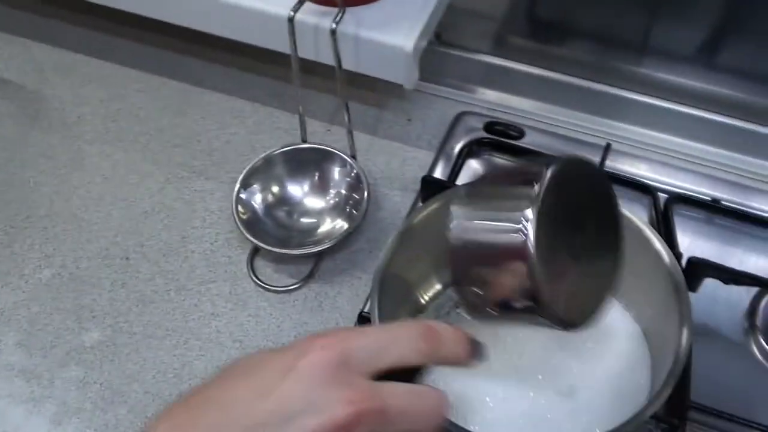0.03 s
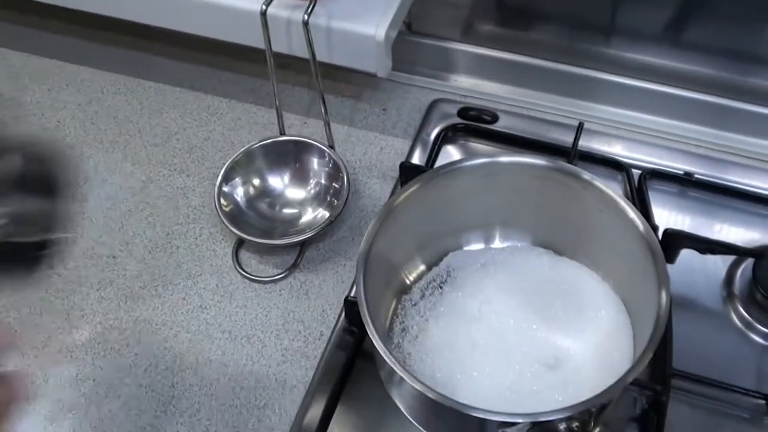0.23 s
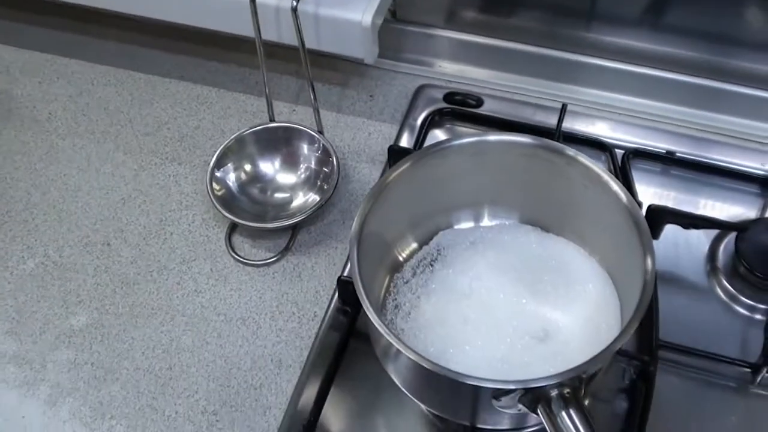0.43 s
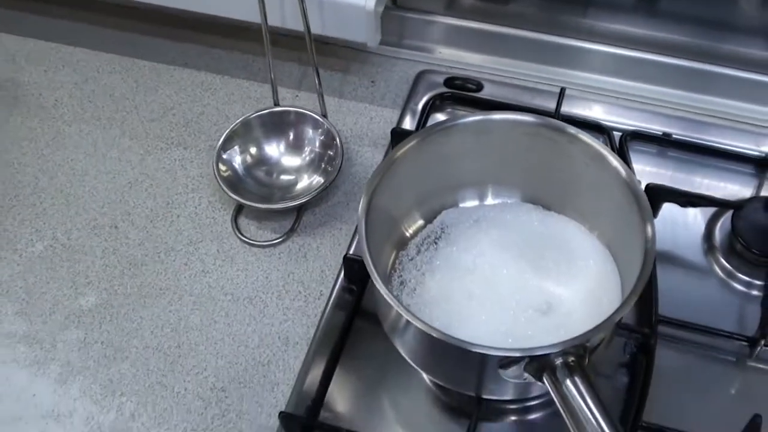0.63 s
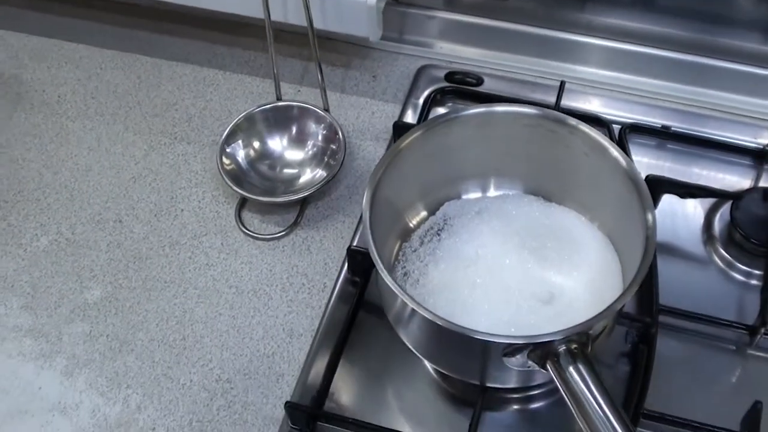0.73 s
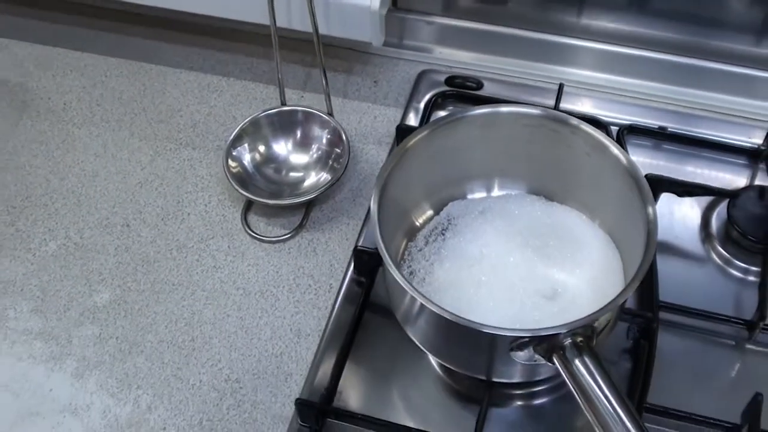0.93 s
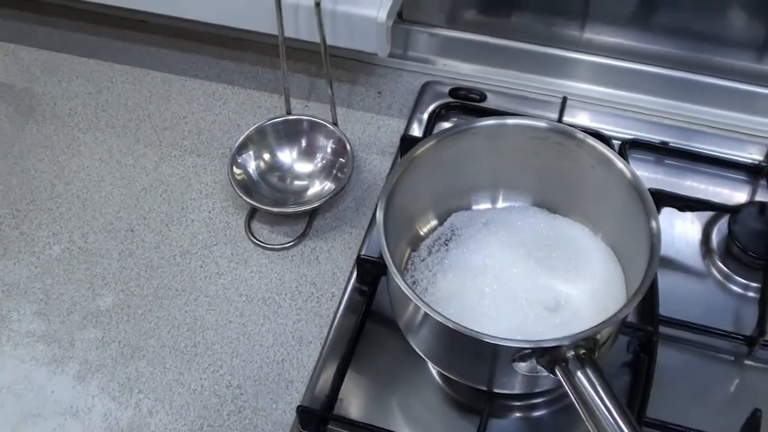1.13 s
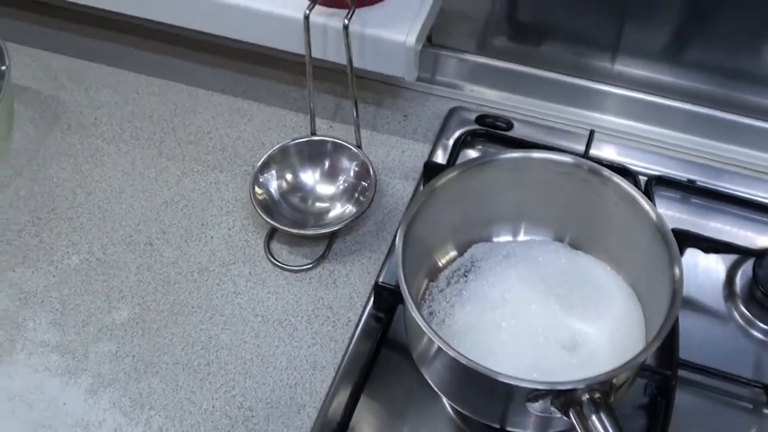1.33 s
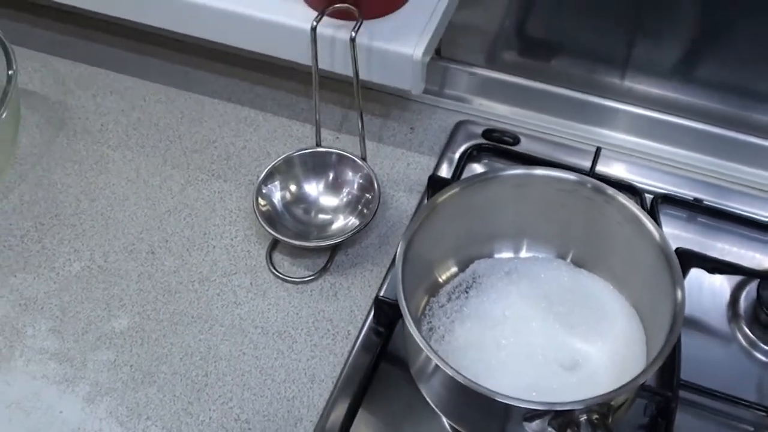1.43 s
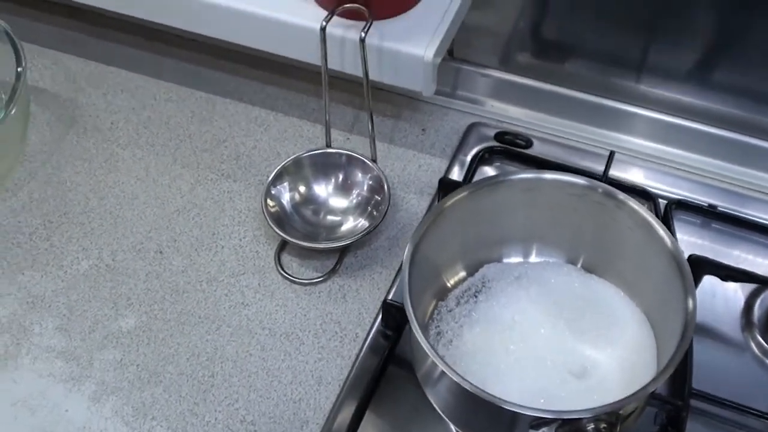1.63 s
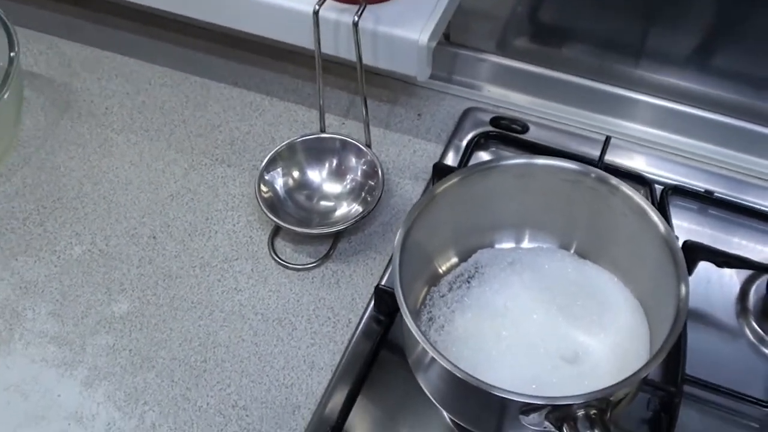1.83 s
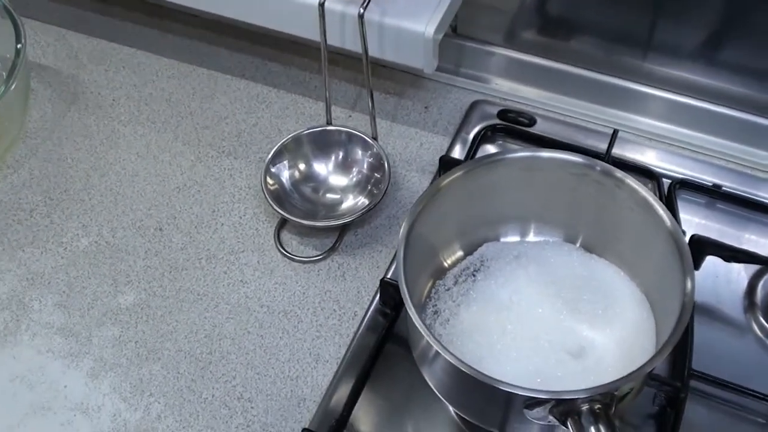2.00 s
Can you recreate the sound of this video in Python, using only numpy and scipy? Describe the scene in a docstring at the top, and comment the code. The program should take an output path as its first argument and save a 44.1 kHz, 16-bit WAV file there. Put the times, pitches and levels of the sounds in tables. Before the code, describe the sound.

A steel measuring cup clunks and clatters onto a worktop, then scrapes gritty sugar and knocks a vessel.

```python
"""A small kitchen with a faint hum: sugar is poured and a steel measuring cup is put down on a worktop.
The last sugar hisses into a saucepan (dense tiny impacts); a short gritty scuff follows (finer grains).
The empty cup lands, bounces and clatters to rest: damped bursts plus decaying modes of worktop, base and rim.
It is then pushed over grit (shaped grain noise, bumps), and another vessel is knocked (a burst, ringing modes).
Each blow gets its own decaying-noise reverberation; shaped noise and steady sines make the background."""
import sys
import numpy as np
from scipy import signal
from scipy.fft import rfft, irfft, next_fast_len
from scipy.io import wavfile
from scipy.ndimage import uniform_filter1d, minimum_filter1d, map_coordinates

SR = 44100
rng = np.random.default_rng(int(sys.argv[2]) if len(sys.argv) > 2 else 0)


def int16_out(signal):
    """Quantize to a 16-bit WAV file."""
    q = np.round(np.clip(np.atleast_2d(signal).T, -1, 1) * 32767)
    wavfile.write(sys.argv[1], SR, q.astype(np.int16))


N = 91022

# All spectra are relative: coloured() rescales to rms 1.
# cup contacts [t/s, thud level/dB, worktop ring level/dB, worktop tilt/(dB/octave), base ring level/dB,
# rim ring level/dB, rim t60/s, crack level/dB]
CUP_CONTACTS = [(0.7108, -2, -20, 1.5, -0.5, -33, 0.23, -22), (0.7362, -16, -21.5, 2, -1, -42, 0.073, -32),
                (0.7993, -19.5, -23, 3, -9.5, -30.5, 0.035, -24.5),
                (0.9147, -26.5, -37, -4, -42, -26.5, 0.21, -15),
                (0.927, -10.5, -20, -3, -16, -17, 0.087, -14),
                (0.9358, -21.5, -25, 3.5, -15.5, -22, 0.14, -17.5),
                (0.985, -19.5, -36.5, -2, -36, -13, 0.032, -12.5),
                (1.0010, -15.5, -25.5, 1, -42, -36, 0.15, -34)]
# cup base modes [f/Hz, level/dB, t60/s]
BASE_MODES = [(1250, -6, .035), (1288, 5, .045), (1323, -17, .36), (1700, -14, .03), (2010, -19, .03)]
# cup rim modes [f/Hz, level/dB]
RIM_MODES = [(2630, -9), (2955, -13.5), (4250, -0.5), (4400, -4), (5003, -12.5), (5890, -9), (6400, -7.5),
             (7415, -3.5), (8690, -9), (10090, -13)]
# worktop modes [f/Hz, level/dB]
WORKTOP_MODES = [(296, -6.5), (432, -7), (555, -8), (625, -4.5), (710, -6), (787, -0.5), (864, -5.5),
                 (953, -1.5), (1077, -2.5), (1154, -12), (1246, -4.5), (1402, -14)]
# spectrum of a flat landing [f/Hz, level/dB]
THUD_SPECTRUM = [(200, -23), (290, -5), (510, -9), (850, -0.5), (1150, -5.5), (1500, -14), (4000, -48.5)]
# spectrum of an edge contact [f/Hz, level/dB]
CRACK_SPECTRUM = [(400, -19), (2700, -2.5), (3600, -11), (5000, -10.5), (7200, 1), (9500, -8), (16000, -21)]
# level of the drag noises [t/s, rumble level/dB, rasp level/dB, hiss level/dB]
DRAG_LEVELS = [(1.165, -65, -48, -55), (1.19, -48, -37.5, -42), (1.26, -46, -37.5, -40),
               (1.34, -38, -41.5, -37.5), (1.41, -37.5, -34, -32.5), (1.47, -35.5, -30, -26.5),
               (1.55, -28, -32, -30.5), (1.64, -37.5, -32.5, -28.5), (1.70, -29, -28, -30.5),
               (1.80, -34.5, -31.5, -32), (1.88, -44, -36, -39.5), (1.96, -40, -42.5, -54),
               (2.1, -70, -34.5, -54)]
# drag rumble spectrum [f/Hz, level/dB]
RUMBLE_SPECTRUM = [(40, -46), (110, -12), (410, 3), (490, -6), (570, -4.5), (850, -6), (1600, -20),
                   (4000, -59)]
# drag rasp spectrum [f/Hz, level/dB]
RASP_SPECTRUM = [(400, -18), (1000, 2), (2500, 2.5), (4800, -4), (9000, -21.5)]
# drag hiss and bump grit spectrum [f/Hz, level/dB]
HISS_SPECTRUM = [(1500, -31), (3500, -5.5), (4900, -3.5), (6600, 3), (7900, -0.5), (12000, -19.5),
                 (16000, -36)]
# singing of the pressed, sliding rim [t/s, level/dB]
SING_LEVELS = [(1.18, -49), (1.3, -41.5), (1.46, -29), (1.56, -35.5), (1.72, -55)]
# resonances of the singing rim [f/Hz, width/Hz, level/dB]
SING_RESONANCES = [(4250, 280, 4.5), (6740, 740, -9)]
# bumps of the sliding cup [t/s, thump level/dB, boom level/dB, grit level/dB]
SLIDE_BUMPS = [(1.283, -29.5, -60, -29.5), (1.318, -28, -54, -27.5), (1.424, -23, -60, -32),
               (1.448, -15.5, -60, -17.5), (1.705, -30, -23, -45), (1.723, -23, -28, -31),
               (1.745, -33, -26.5, -45)]
# bump thump spectrum [f/Hz, level/dB]
THUMP_SPECTRUM = [(150, -16), (270, 3.5), (400, -8), (560, 6), (800, -8), (1400, -10.5), (2600, -18),
                  (6000, -49)]
# bump boom spectrum [f/Hz, level/dB]
BOOM_SPECTRUM = [(50, -21), (85, 1), (160, -10.5), (400, -0.5), (800, -40)]
# modes of the knocked vessel [f/Hz, level/dB]
VESSEL_MODES = [(152, -2), (182, -5), (305, -1), (339, 3), (415, -3), (748, -5), (985, 0), (1325, -3),
                (1540, -5), (2148, 1), (2215, -6), (2498, -9), (4204, -15), (4500, -12), (4565, -5),
                (6600, -11), (8005, -19)]
# spectrum of the knock [f/Hz, level/dB]
KNOCK_SPECTRUM = [(70, -25), (150, -8.5), (330, 6), (620, -5), (1050, 1), (2200, -4), (3400, -19),
                  (7300, -18.5), (10000, -39)]
# rustle of loose sugar [t/s, level/dB]
RUSTLE_LEVELS = [(.72, -39.5), (.87, -43.5), (1.06, -39.5), (1.16, -45.5)]
# scuff spectrum [f/Hz, level/dB]
SCUFF_SPECTRUM = [(300, -19), (1600, -19.5), (3000, -8.5), (5000, -11), (6400, -3), (8000, -14),
                  (16000, -32)]
# sugar flow into the pan [t/s, level/dB]
POUR_LEVELS = [(-.04, -38.5), (.055, -32.5), (.12, -38), (.18, -43), (.3, -49), (.55, -49.5)]
# sugar grain spectrum [f/Hz, level/dB]
SUGAR_SPECTRUM = [(150, -36), (350, -8), (700, -9.5), (1350, -0.5), (2200, 0.5), (4200, -2.5), (7200, -5),
                  (10000, -14), (16000, -27)]
# room noise spectrum [f/Hz, level/dB]
AIR_SPECTRUM = [(25, -44), (70, -7.5), (250, -4), (900, -10.5), (2300, -20), (8000, -19), (16000, -24.5)]
# appliance hum [f/Hz, rms level/dB]
HUM_TONES = [(167, -57.5), (251, -54.5), (341, -55), (544, -59)]
# reverberation decay [f/Hz, t60/s]
ROOM_DECAY = [(350, 0.63), (800, 0.5), (7000, 0.37), (15000, 0.32)]
# stereo width [f/Hz, side level/dB]
SIDE_WIDTH = [(100, -23), (1100, -9), (8000, -11), (14000, -30)]
# balance of the worktop sounds [f/Hz, left over right level/dB]
LEFT_BALANCE = [(300, -0.5), (4000, 2), (12000, 1.2)]

THUD_T60_S, CRACK_T60_S, THUMP_T60_S, BOOM_T60_S, KNOCK_T60_S = 0.052, 0.042, 0.082, 0.26, 0.096
THUD_LOW_HZ, THUMP_LOW_HZ, BOOM_LOW_HZ, KNOCK_LOW_HZ = 223, 160, 50.4, 114  # little radiates below
BASE_RISE_S, RIM_RISE_S, WORKTOP_RISE_S = 0.004, 0.00042, 0.0013
WORKTOP_T60_S, TILT_PIVOT_HZ, VESSEL_T60_S = 0.2, 700, 0.38
FLUTTER_RAD, FLUTTER_KNOTS_PER_S = 0.33, 89.4  # unsteady phase of the modes
DETUNE_SHARE = 0.002  # the way of touching shifts the modes
SURGE_DB, SURGE_KNOTS_PER_S = 0.93, 32  # uneven sliding
SUGAR_GRAINS_PER_S, SCUFF_GRAINS_PER_S, COARSE_GRAINS_PER_S = 9000, 30000, 630
COARSE_DB = -8.5  # relative to the fine grains
CLIMB_START_S, CLIMB_END_S, CLIMB_RATIO = 1.5, 1.58, 1.106
KNOCK_S, KNOCK_DB, KNOCK_RING_DB = 1.9672, -11.5, -25
SCUFF_S, SCUFF_END_S, SCUFF_RELEASE_S = 0.558, 0.673, 0.036
SCUFF_DB, SCUFF_FALL_DB_PER_S, SCUFF_TICK_DB = -27, 101, -20
AIR_DB = -45.5
WET_DB, THUD_WET_DB, BODY_WET_DB = -5.5, -7.5, -12  # reverberation relative to direct
WALL_DELAY_S = 0.006
BODY_SIDE = 0.28  # leftward side share, before narrowing
TOP_HZ = 16000


def amp(db):
    """Decibels to gain."""
    return 10 ** (np.asarray(db) / 20)


def unit(x):
    """Scale to rms 1."""
    return x / np.sqrt(np.mean(x ** 2) + 1e-20)


def along(points, hz):
    """Read (f/Hz, value) points on a log frequency axis."""
    f, v = np.transpose(points)
    return np.interp(np.log(hz + 1), np.log(f + 1), v)


def levels(rows):
    """One gain curve per dB column; silent outside the rows."""
    s, *columns = np.transpose(rows)
    t = np.arange(N) / SR
    inside = (t >= s[0]) * (t <= s[-1])
    return [amp(np.interp(t, s, db)) * inside for db in columns]


def filtered(x, response):
    """Multiply the spectrum of x by a response of frequency."""
    n = x.shape[-1]
    m = next_fast_len(n + 8192)
    hz = np.fft.rfftfreq(m, 1 / SR)
    return irfft(rfft(x, m) * response(hz), m)[..., :n]


def coloured(x, spectrum):
    """Shape x by the spectrum, at rms 1."""
    return unit(filtered(x, lambda hz: amp(along(spectrum, hz))))


def wobble(knots_per_s):
    """Smooth random curve through normally distributed knots."""
    return map_coordinates(rng.standard_normal(size=1024), [np.arange(N) * knots_per_s / SR])


def grains(spectrum, per_s=SUGAR_GRAINS_PER_S):
    """Dense tiny impacts of random size, as mid and side."""
    struck = rng.random((2, N)) < per_s / SR
    return coloured(struck * rng.standard_normal((2, N)), spectrum)


def burst(spectrum, t60_s, low_hz):
    """Decaying evened-out noise: many close, well damped modes struck at once."""
    t = np.arange(SR // 2) / SR
    dense = coloured(rng.standard_normal(len(t)), spectrum)
    even = dense / np.sqrt(np.abs(uniform_filter1d(dense ** 2, size=400)) + 1e-9)
    struck = even * amp(-60 * t / t60_s) * (1 - np.exp(-t / 0.00088))
    highpass = signal.butter(2, low_hz, 'highpass', fs=SR, output='sos')
    return signal.sosfilt(highpass, struck)


def ring(modes, rise_s):
    """Decaying, fluttering modes, each with random tuning and strength at every blow."""
    t = np.arange(SR // 2) / SR
    tones = np.zeros(len(t))
    for hz, db, t60_s in modes:
        shift, strength_db = rng.standard_normal(2)
        flutter = FLUTTER_RAD * wobble(FLUTTER_KNOTS_PER_S)[:len(t)]
        phase = 2 * np.pi * rng.random() + flutter
        decay = amp(db + strength_db - 60 * t / t60_s)
        tones += decay * np.sin(2 * np.pi * hz * (1 + DETUNE_SHARE * shift) * t + phase)
    return tones * (1 - np.exp(-t / rise_s))


def in_kitchen(sound, s, wet_db=WET_DB, side=0):
    """Place a blow at s with a delayed tail of decaying noise, as mid and side."""
    hz, t, z = signal.stft(rng.standard_normal((2, SR // 2)), SR, nperseg=256)
    decay = amp(-60 * t / along(ROOM_DECAY, hz)[:, None])
    tail = signal.istft(z * decay, SR, nperseg=256)[1]
    tail = amp(wet_db) * tail / np.linalg.norm(tail[0])
    answer = np.pad(tail, ((0, 0), (int(WALL_DELAY_S * SR), 0)))
    answer[:, 0] += [1, side]  # direct sound
    wet = signal.fftconvolve(sound[None], answer, axes=1)
    return np.pad(wet, ((0, 0), (round(s * SR), N)))[:, :N]


def cup():
    """Flat landings ring worktop and base; edge contacts crack and ring the rim, briefly if held down."""
    clatter = np.zeros((2, N))
    for s, thud_db, top_db, tilt, base_db, rim_db, rim_t60_s, crack_db in CUP_CONTACTS:
        rim_modes = [(hz, db, rim_t60_s) for hz, db in RIM_MODES]
        top_modes = [(hz, db + tilt * np.log2(hz / TILT_PIVOT_HZ), WORKTOP_T60_S)
                     for hz, db in WORKTOP_MODES]
        edge = amp(crack_db) * burst(CRACK_SPECTRUM, CRACK_T60_S, THUD_LOW_HZ)
        edge += amp(rim_db) * ring(rim_modes, RIM_RISE_S)
        body = amp(top_db) * ring(top_modes, WORKTOP_RISE_S)
        body += amp(base_db) * ring(BASE_MODES, BASE_RISE_S)
        thud = amp(thud_db) * burst(THUD_SPECTRUM, THUD_T60_S, THUD_LOW_HZ)
        clatter += in_kitchen(edge, s)
        clatter += in_kitchen(body, s, BODY_WET_DB, BODY_SIDE)
        clatter += in_kitchen(thud, s, THUD_WET_DB)
    return clatter


def drag():
    """Cup slides unevenly on grit: rumble, rasp, hiss, and noise through the rim resonances."""
    rumble, rasp, hiss = levels(DRAG_LEVELS)
    pressed, = levels(SING_LEVELS)

    def rim_response(f):
        return sum(amp(db) / (1 + (2 * (f - hz) / width) ** 2) for hz, width, db in SING_RESONANCES)

    slide = rumble * grains(RUMBLE_SPECTRUM) + rasp * grains(RASP_SPECTRUM)
    slide += hiss * gritty_hiss()
    slide += pressed * unit(filtered(grains(CRACK_SPECTRUM), rim_response))
    return slide * amp(SURGE_DB * wobble(SURGE_KNOTS_PER_S))


def gritty_hiss():
    """Fine and coarse grains under the cup, brighter as it speeds up."""
    speed = np.interp(np.arange(N) / SR, [CLIMB_START_S, CLIMB_END_S], [0, 1])
    bright = [(hz * CLIMB_RATIO, db) for hz, db in HISS_SPECTRUM]
    fine = np.sqrt(1 - speed) * grains(HISS_SPECTRUM) + np.sqrt(speed) * grains(bright)
    return unit(fine + amp(COARSE_DB) * grains(HISS_SPECTRUM, COARSE_GRAINS_PER_S))


def bumps():
    """Bumps of the sliding cup shake the worktop: damped thump, longer boom, grit."""
    total = np.zeros((2, N))
    for s, thump_db, boom_db, grit_db in SLIDE_BUMPS:
        bump = amp(thump_db) * burst(THUMP_SPECTRUM, THUMP_T60_S, THUMP_LOW_HZ)
        bump += amp(boom_db) * burst(BOOM_SPECTRUM, BOOM_T60_S, BOOM_LOW_HZ)
        bump += amp(grit_db) * burst(HISS_SPECTRUM, THUMP_T60_S, THUMP_LOW_HZ)
        total += in_kitchen(bump, s)
    return total


def knock():
    """One dull blow leaves the vessel's modes ringing."""
    blow = amp(KNOCK_DB) * burst(KNOCK_SPECTRUM, KNOCK_T60_S, KNOCK_LOW_HZ)
    modes = [(hz, db, VESSEL_T60_S) for hz, db in VESSEL_MODES]
    ringing = amp(KNOCK_RING_DB) * ring(modes, RIM_RISE_S)
    return in_kitchen(blow, KNOCK_S) + in_kitchen(ringing, KNOCK_S, BODY_WET_DB)


def scuff():
    """A light touch, then a brief fading scrape of fine grains."""
    t = np.arange(N) / SR
    corners_s = [SCUFF_S, SCUFF_S + 0.0013, SCUFF_END_S, SCUFF_END_S + SCUFF_RELEASE_S]
    stroke = np.interp(t, corners_s, [0, 1, 1, 0])
    fade = amp(SCUFF_DB - SCUFF_FALL_DB_PER_S * np.abs(t - SCUFF_S))
    scrape = stroke * fade * grains(SCUFF_SPECTRUM, SCUFF_GRAINS_PER_S)
    touch = amp(SCUFF_TICK_DB) * burst(CRACK_SPECTRUM, CRACK_T60_S, THUD_LOW_HZ)
    return scrape + in_kitchen(touch, SCUFF_S)


def rustle():
    """Loose sugar grains are shaken about under the clattering cup."""
    shaken, = levels(RUSTLE_LEVELS)
    return shaken * amp(SURGE_DB * wobble(SURGE_KNOTS_PER_S)) * grains(SUGAR_SPECTRUM)


def pour():
    """Grain impacts of the sugar stream thinning out in the pan."""
    flow, = levels(POUR_LEVELS)
    return flow * grains(SUGAR_SPECTRUM)


def background():
    """Shaped room noise and the steady sines of an appliance hum, the hum in mid only."""
    t = np.arange(N) / SR
    hum = sum(amp(db) * np.sqrt(2) * np.sin(2 * np.pi * (hz * t + rng.random())) for hz, db in HUM_TONES)
    air = amp(AIR_DB) * coloured(rng.standard_normal((2, N)), AIR_SPECTRUM)
    return air + np.array([hum, np.zeros(N)])


def stereo(pair):
    """Mid and side to a narrow left-right image."""
    mid = pair[0]
    side = filtered(pair[1], lambda hz: amp(along(SIDE_WIDTH, hz)))
    return np.array([mid + side, mid - side])


def scene():
    """Pan straight ahead; worktop balanced by frequency, its treble to the left."""
    worktop = stereo(cup() + drag() + bumps() + knock() + scuff() + rustle())
    balanced = filtered(worktop, lambda hz: amp(np.outer([.5, -.5], along(LEFT_BALANCE, hz))))
    return balanced + stereo(pour() + background())


def record(dry):
    """Limit peaks to 0.97 with a smoothed gain, then cut everything from TOP_HZ up."""
    needed = .97 / np.maximum(np.abs(dry).max(axis=0), .97)
    gain = uniform_filter1d(minimum_filter1d(needed, size=181), size=181)
    return filtered(dry * gain, lambda hz: hz < TOP_HZ)


dry = scene()
out = record(dry)
int16_out(out)
```